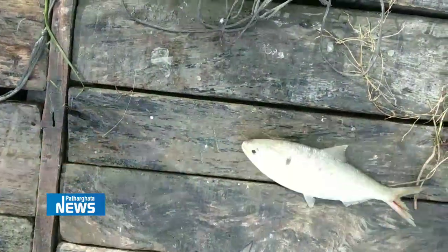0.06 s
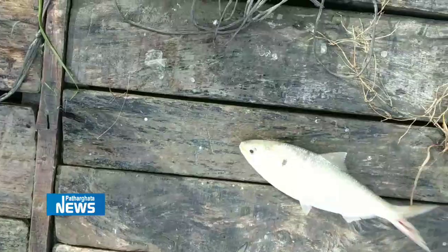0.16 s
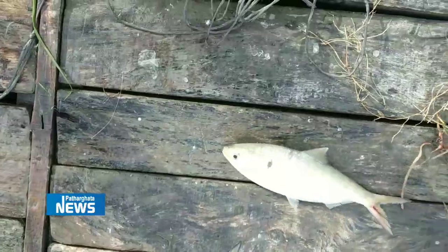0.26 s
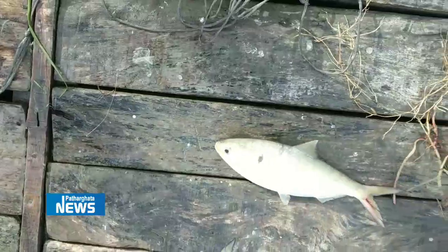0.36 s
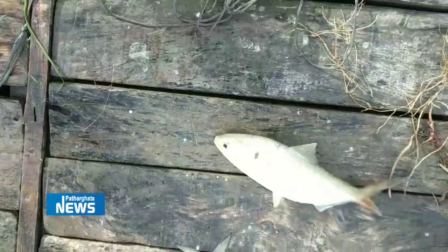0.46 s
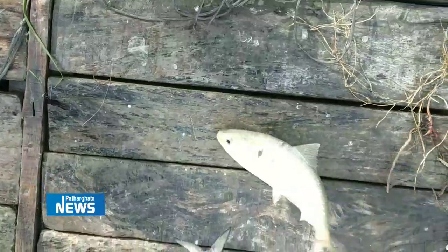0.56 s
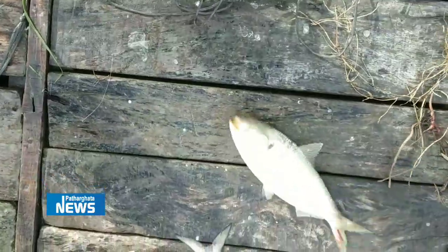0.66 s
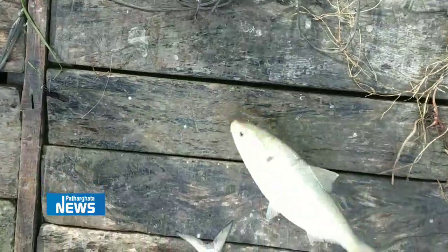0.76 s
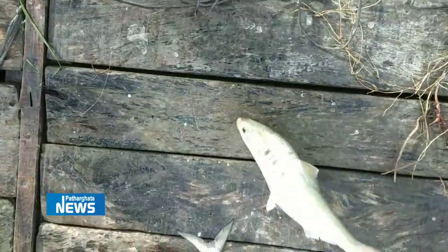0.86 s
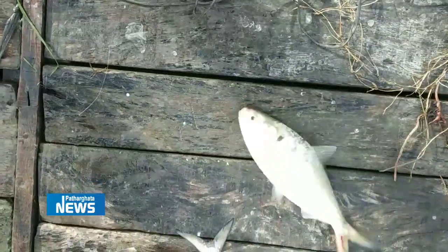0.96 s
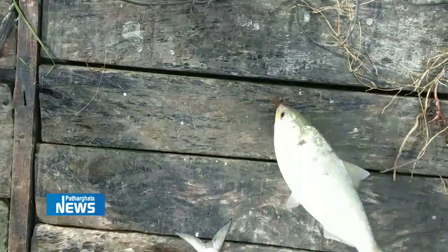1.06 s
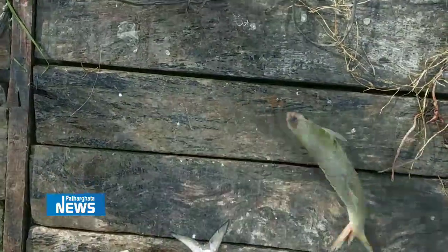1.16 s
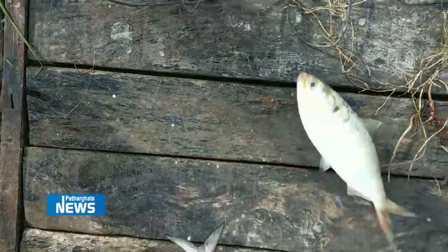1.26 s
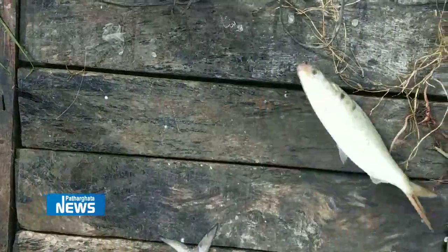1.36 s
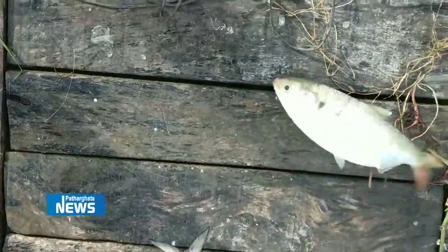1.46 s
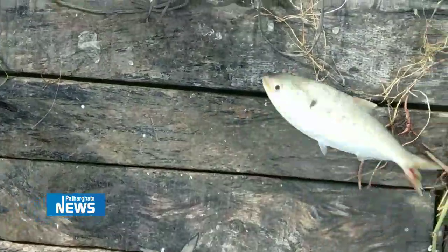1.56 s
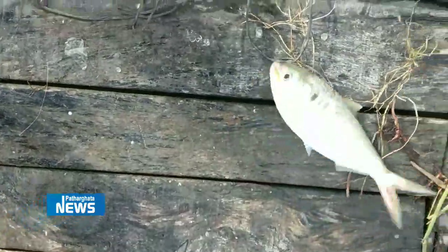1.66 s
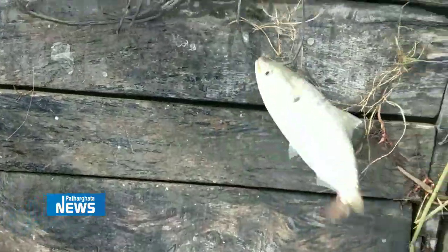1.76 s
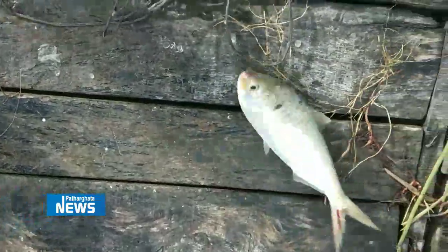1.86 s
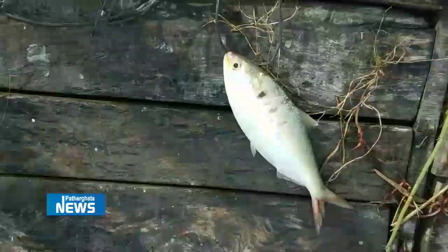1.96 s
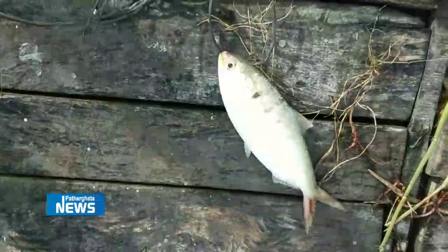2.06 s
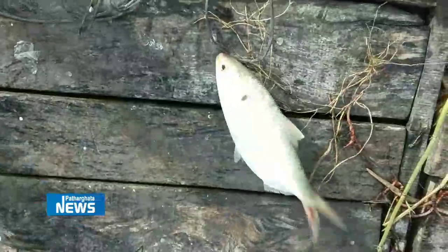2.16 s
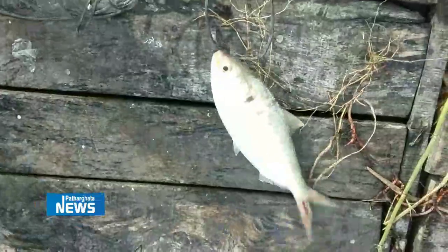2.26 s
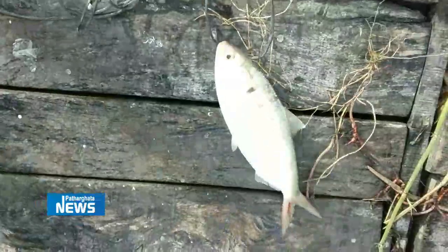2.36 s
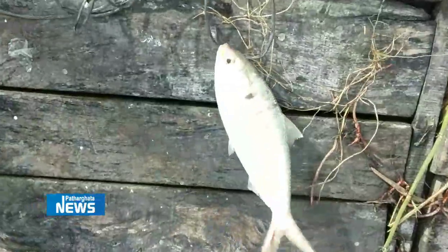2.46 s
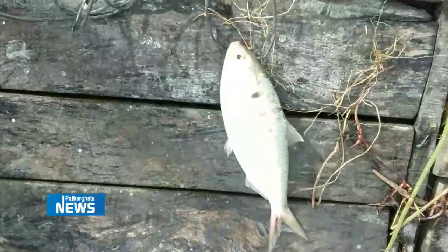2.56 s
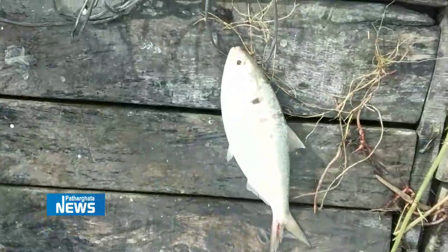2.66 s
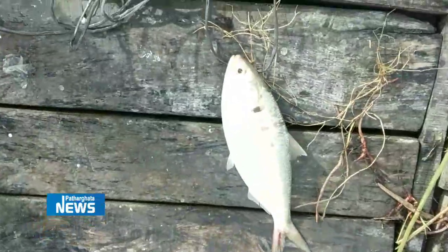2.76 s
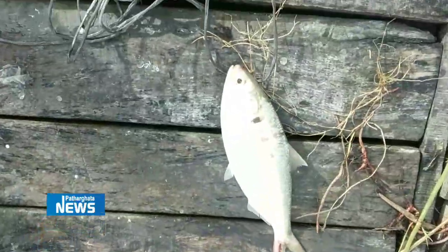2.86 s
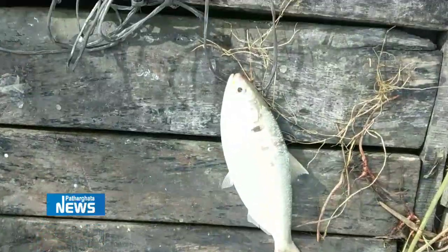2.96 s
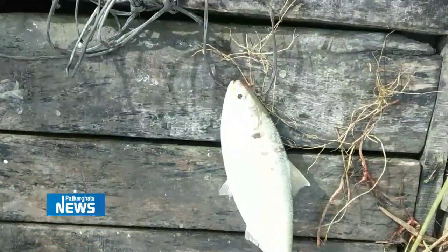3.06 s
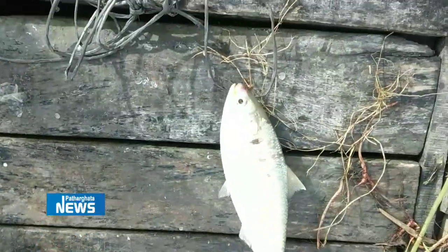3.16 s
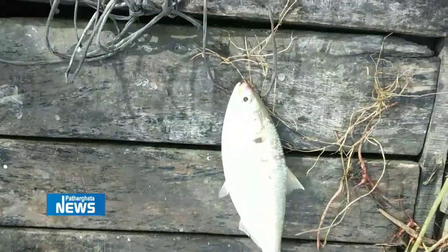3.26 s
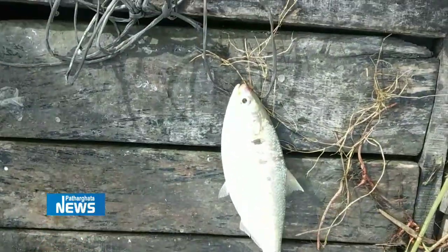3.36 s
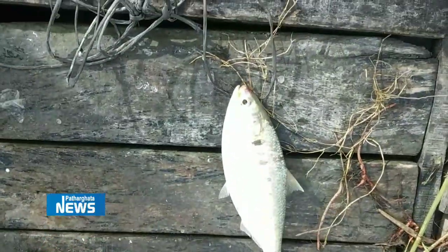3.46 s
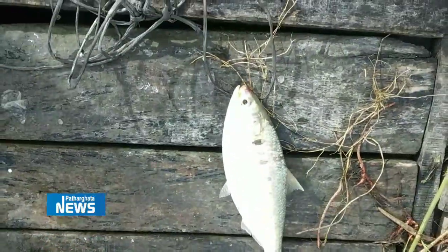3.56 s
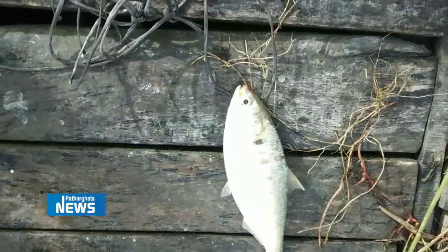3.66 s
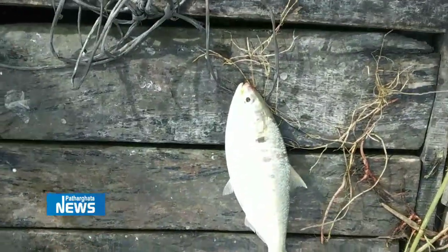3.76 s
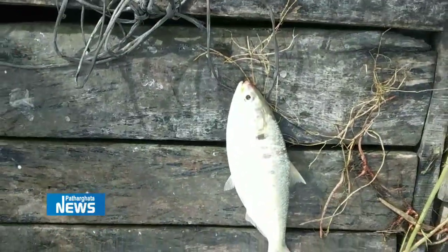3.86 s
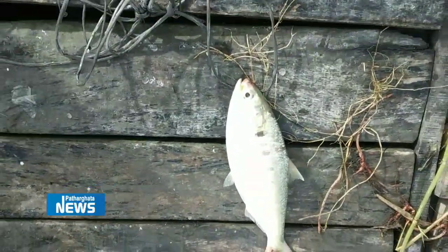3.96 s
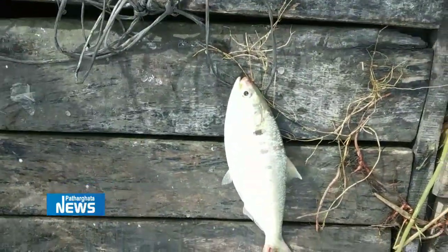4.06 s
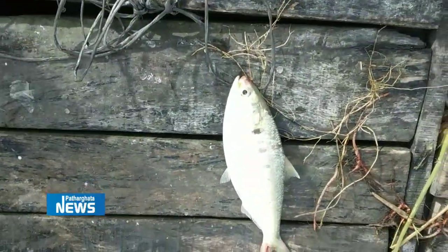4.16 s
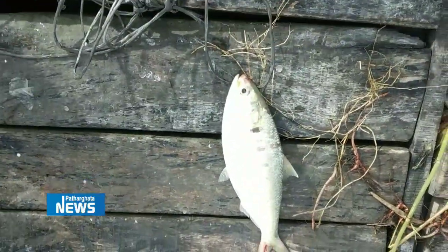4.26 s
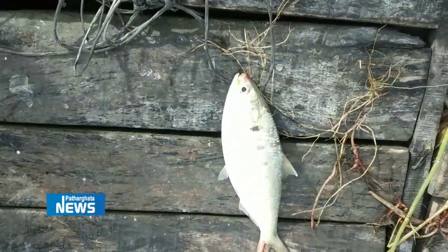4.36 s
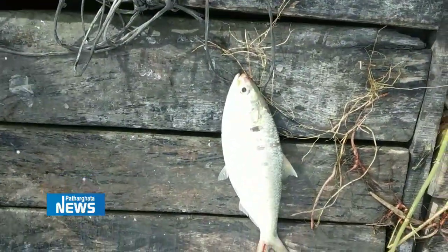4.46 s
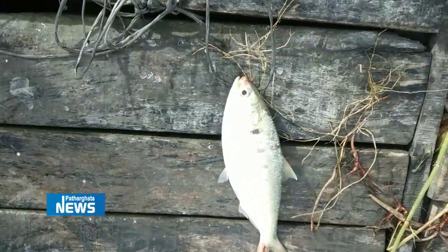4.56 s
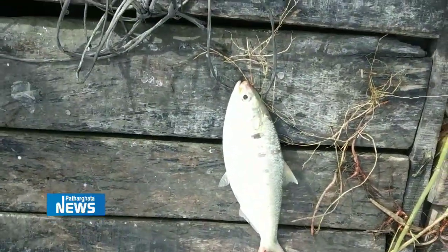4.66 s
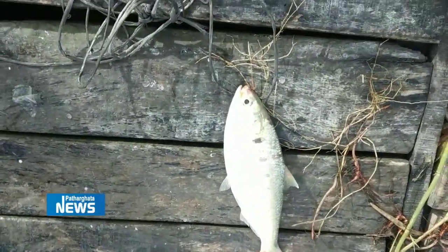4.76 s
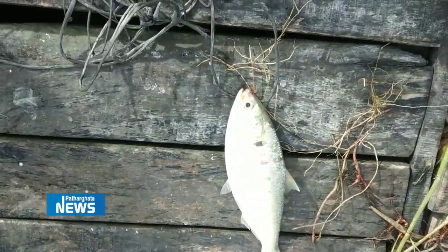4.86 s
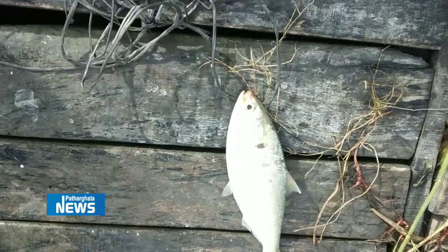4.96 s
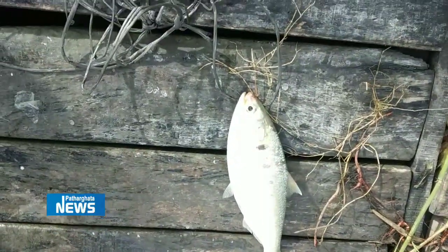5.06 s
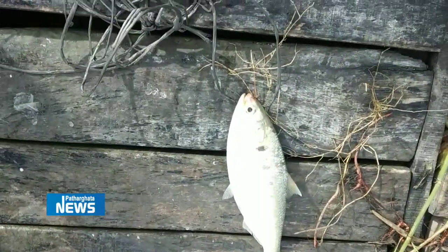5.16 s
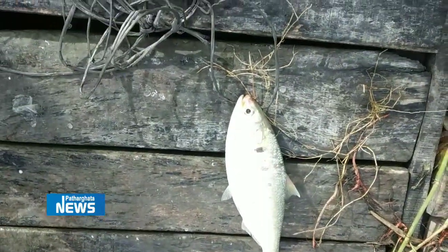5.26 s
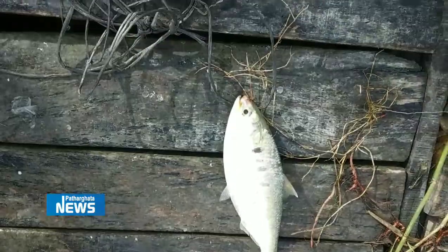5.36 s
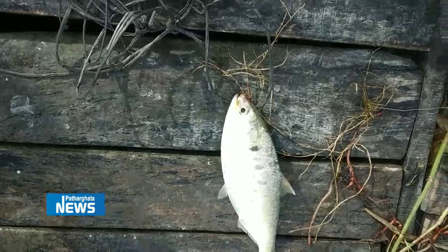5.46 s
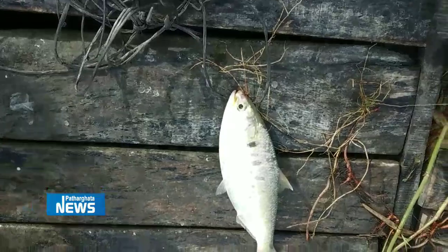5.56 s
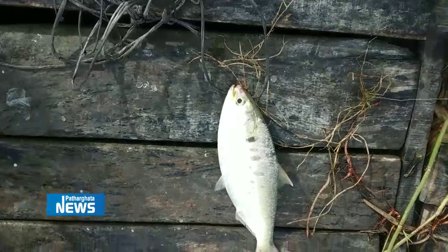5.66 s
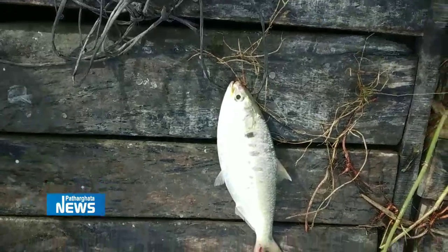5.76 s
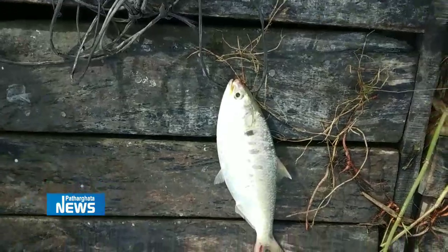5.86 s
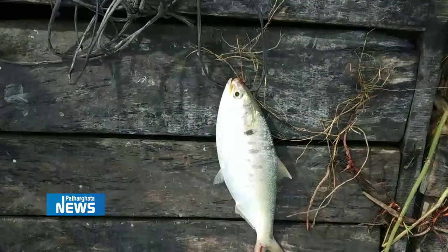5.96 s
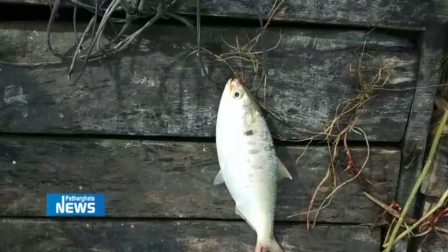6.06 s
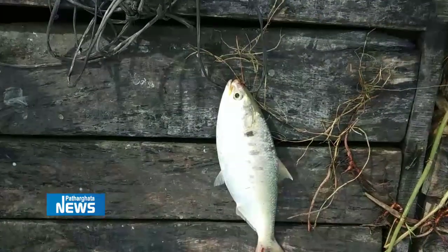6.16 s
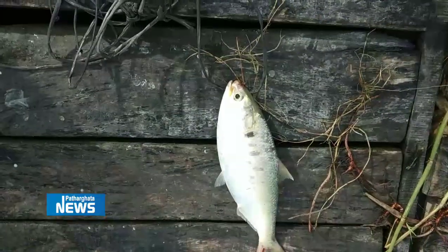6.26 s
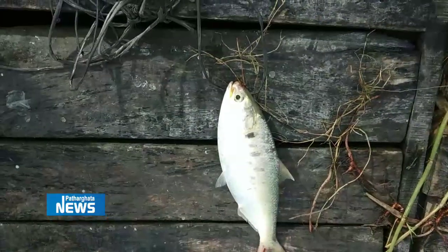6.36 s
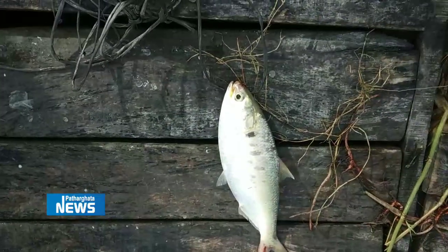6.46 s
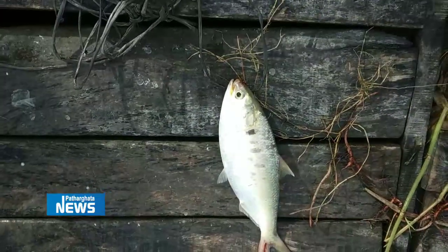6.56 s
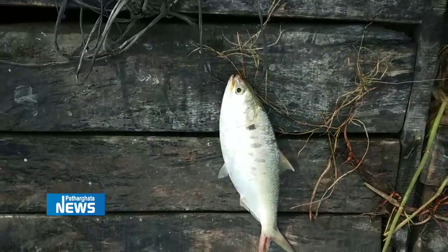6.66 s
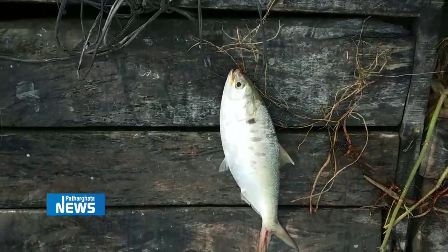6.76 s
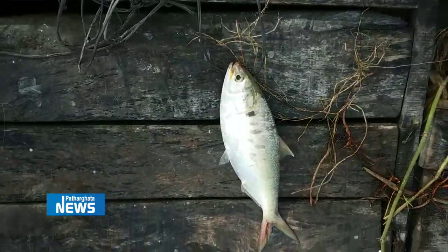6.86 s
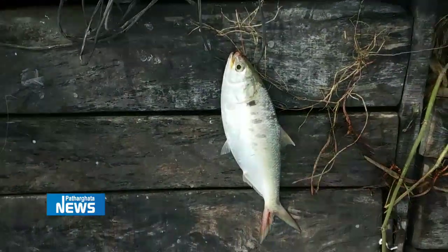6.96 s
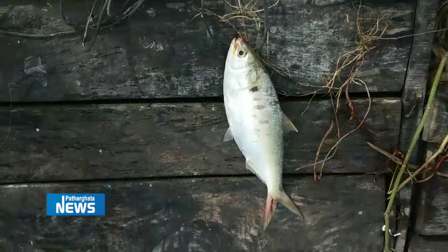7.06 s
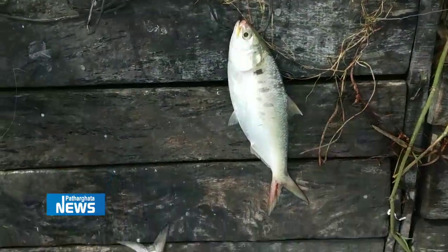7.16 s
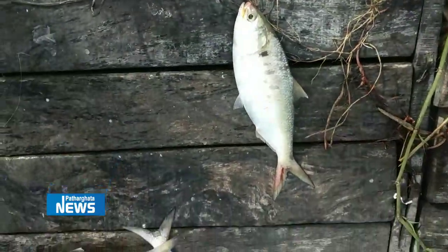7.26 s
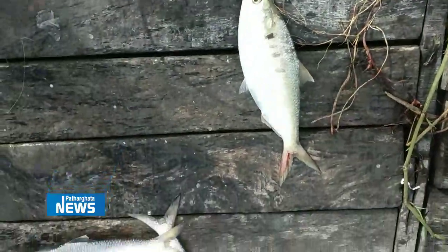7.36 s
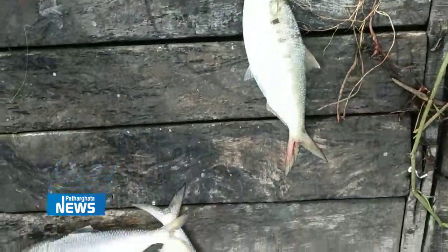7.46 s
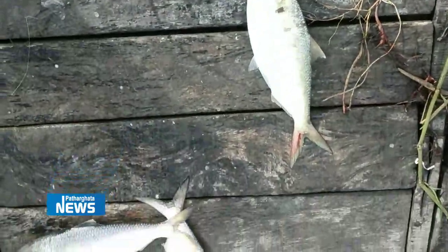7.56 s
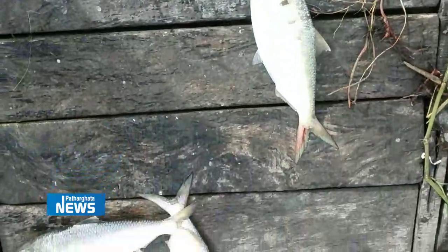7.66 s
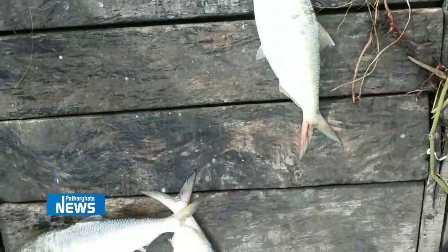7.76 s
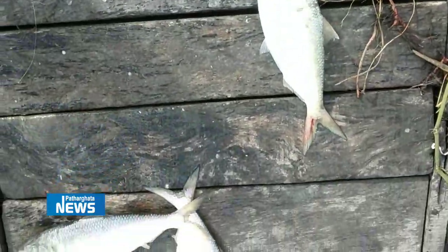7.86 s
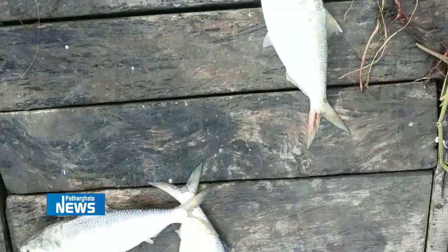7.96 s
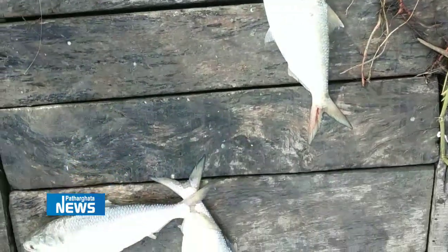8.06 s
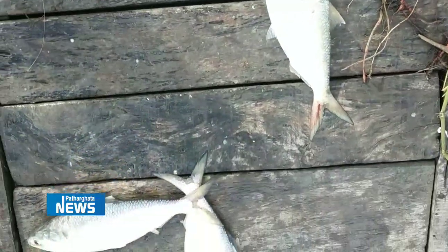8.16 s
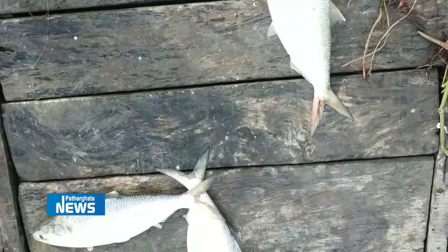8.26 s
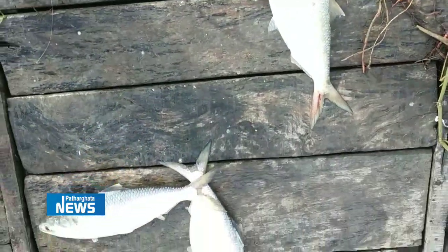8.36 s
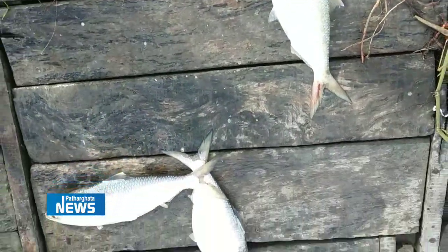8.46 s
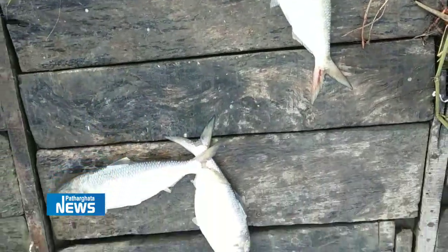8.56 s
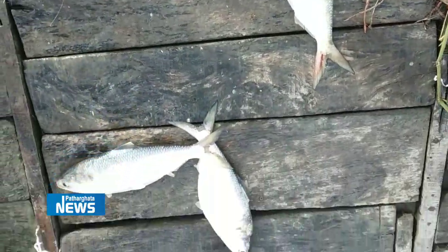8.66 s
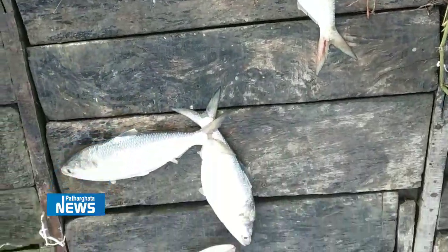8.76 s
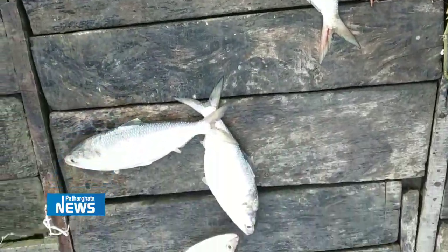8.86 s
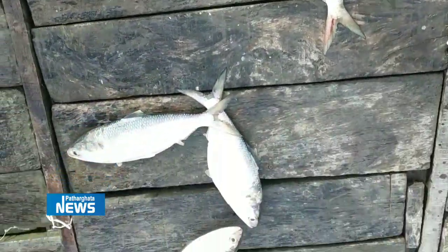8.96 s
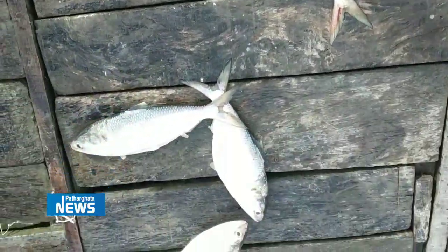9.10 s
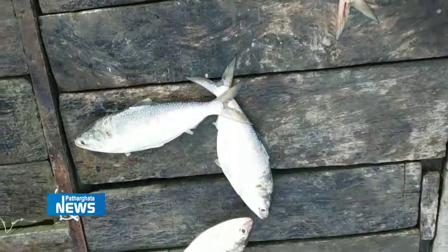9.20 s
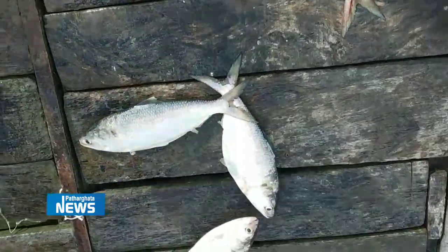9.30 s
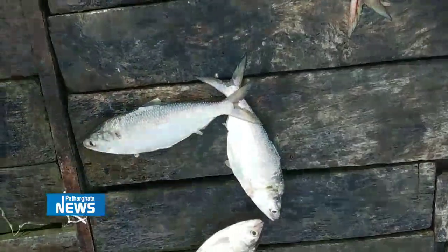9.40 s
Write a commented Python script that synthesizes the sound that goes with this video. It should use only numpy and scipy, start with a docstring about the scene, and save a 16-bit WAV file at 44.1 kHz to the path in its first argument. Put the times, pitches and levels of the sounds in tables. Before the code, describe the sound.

Outdoors on a small wooden boat, an idling diesel putters about fourteen times a second throughout. Near the microphone a fish flops violently, its body booming on the deck and its tail smacking wetly, with tiny squeaks. The flurry dies soon after two seconds; faint rustling, occasional crisp ticks, loose wood clacks and soft low wind buffets remain.

```python
"""A one-cylinder diesel chugs some way off to the left and a light wind brushes the microphone throughout.
From the start a freshly caught fish thrashes on a boat's wet planks: its body thumps the boards and rolls,
its tail slaps and slithers. Loose wood knocks, trapped air pops and thin squeaks join in.
After two seconds the fish tires, leaving twitches, wet ticks and a faint rustle.
Blows ring decaying tones; rubbing, water, wind and clatter are coloured noise; the engine is timed puffs."""
import sys
import numpy as np
from scipy import signal
from scipy.fft import rfft, irfft, next_fast_len
from scipy.io import wavfile

SR = 44100
rng = np.random.default_rng(int(sys.argv[2]) if len(sys.argv) > 2 else 0)


def wav_out(sig):
    """Save sig, one row per channel (or a flat mono array), as 16-bit PCM at SR to the path in sys.argv[1]."""
    wavfile.write(sys.argv[1], SR, np.round(np.clip(np.atleast_2d(sig).T, -1, 1) * 32767).astype(np.int16))


N = 415863
TIME = np.arange(N) / SR
AGE = TIME[:SR // 2]   # seconds since a blow
CUTOFF_HZ = 15700   # nearly everything above is removed
# In all tables t60 is the seconds a sound needs to fall by 60 dB. Levels are relative:
# the functions may add a common level on top.


def from_db(db):
    """Turn decibels into a gain."""
    return 10 ** (np.asarray(db) / 20)


def rms_one(x):
    """Scale to an rms (average strength) of 1."""
    return x / np.sqrt(np.mean(x ** 2) + 1e-20)


def peak_one(x):
    """Scale to a peak of 1."""
    return x / (np.abs(x).max() + 1e-20)


def in_time(rows):
    """Join the points of a table by straight lines, one value per sample."""
    return np.interp(TIME, *np.transpose(rows))


def at_hz(points, hz):
    """Read a spectrum table on a log-frequency axis."""
    table_hz, value = np.transpose(points)
    return np.interp(np.log(hz), np.log(table_hz), value)


def pan(db):
    """Left and right gains that differ by this many dB; above 0 favours the left."""
    return from_db(np.array([[db], [-db]]) / 2)


def add(out, s, sound):
    """Mix a sound in from second s on."""
    i = max(int(s * SR), 0)
    out[:, i:i + sound.shape[-1]] += sound[..., :max(N - i, 0)]


def fade(t60):
    """Exponential decay after a blow."""
    return np.exp(-np.log(1000) * AGE / max(t60, 1e-3))


def mode(hz, t60):
    """One struck resonance: a tone that dies away."""
    return np.sin(2 * np.pi * hz * AGE) * fade(t60)


def pressure_swing(lead_s, width_s):
    """Pressure dips, then rises steeply through zero at lead_s and comes back; peak 1."""
    swing = (AGE - lead_s) / width_s
    return peak_one(swing * np.exp(-swing ** 2 / 2))


def resonate(x, hz, width_hz):
    """Filter through a two-pole resonance with gain 1 on top."""
    r = np.exp(-np.pi * width_hz / SR)
    feedback = [1, -2 * r * np.cos(2 * np.pi * hz / SR), r * r]
    return signal.lfilter(np.array([1, 0, -1]) * (1 - r * r) / 2, feedback, x)


def drift(rate):
    """Wander by chance through `rate` random points per second, with a spread near 1."""
    knots = rng.standard_normal(4096)
    return np.interp(TIME * rate, np.arange(len(knots)), knots)


def grains(spread_db):
    """Gain of half-millisecond grains of uneven size."""
    return from_db(spread_db * np.repeat(rng.standard_normal(N // 20 + 1), 20)[:N])


# How alike left and right are, for close and for distant sounds.
# Each row: frequency in Hz, likeness from -1 (opposite) to 1 (the same).
NEAR_LIKENESS = [(100,0.99),(1000,0.11),(4000,0.042),(12000,0.04)]
FAR_LIKENESS = [(30,0.76),(130,1),(290,0.87),(640,0.49),(1400,-0.63),(3100,0.18),(7000,-0.61)]


def noise(colour, likeness):
    """Stereo noise with a given spectrum and left-right likeness; rms 1."""
    size = next_fast_len(N)
    hz = np.maximum(np.arange(size // 2 + 1) * SR / size, 1)
    alike = np.clip(at_hz(likeness, hz), -1, 1)
    gain = from_db(at_hz(colour, hz)) * (hz > 12) * (hz < CUTOFF_HZ + 500)
    # the shared part grows with likeness, the opposed part shrinks
    shares = np.sqrt([1 + alike, 1 - alike])
    mid, side = irfft(rfft(rng.standard_normal((2, size))) * gain * shares, size)[:, :N]
    return rms_one(np.array([mid + side, mid - side]))


def pieces(x, count):
    """Cut random stretches of a noise, one for each blow."""
    return [x[:, i:i + len(AGE)] for i in rng.integers(0, N - len(AGE), count)]


def popping(born, low_hz, high_hz, cycles):
    """Deal clicks at random to short resonances spread in pitch; rms 1."""
    pitches = np.geomspace(low_hz, high_hz, 20)
    dealt = rng.integers(0, len(pitches), N)
    rung = 0
    for k, hz in enumerate(pitches):
        # the tiny offset keeps the filter from slowing down on near-zero numbers
        rung = rung + resonate(born * (dealt == k) + 1e-18, hz, 2 * hz / cycles) / hz
    return rms_one(rung)


# Colour of the steady air and water. Each row: frequency in Hz, level per Hz in dB.
AIR_COLOUR = [(15, -36), (25, -8), (55, -2), (86, 5), (221, -8.5), (359, -19), (523, -15), (703, -20.5),
              (826, -21), (945, -23.5), (1490, -25), (2420, -27.5), (4620, -33.5), (10600, -62),
              (15500, -64)]
# Colour of the wind. Each row: frequency in Hz, level per Hz in dB.
WIND_SPECTRUM = [(15,-37),(35,1.5),(60,-8.5),(110,-12),(200,-25.5),(400,-38),(1000,-94)]
# How alike the wind is left and right. Each row: frequency in Hz, likeness from -1 to 1.
WIND_LIKENESS = [(30,0.16),(150,0.67)]
# Gusts of wind. Each row: time of the peak in seconds, level in dB, seconds to swell or die away.
WIND_GUSTS = [(.48, -22, 0.029), (.65, -34.5, 0.42), (1.85, -48, 0.086), (2.45, -36, 0.099),
              (5.75, -41.5, 0.11), (6.6, -38, 0.069), (7.17, -30.5, 0.14), (7.38, -39, 0.1),
              (7.6, -35.5, 0.18), (8.2, -39.5, 0.19), (9.0, -42.5, 0.31)]


def outdoors(air_db=-42, breeze_db=-57, lump_db=3.5):
    """A steady wash of air and water, and a lumpy breeze with gusts, mostly on the right."""
    air = from_db(air_db) * noise(AIR_COLOUR, FAR_LIKENESS)
    power = from_db(breeze_db) ** 2
    for s, db, swell_s in WIND_GUSTS:
        power = power + from_db(db) ** 2 * np.exp(-((TIME - s) / swell_s) ** 2)
    lumps = from_db(lump_db * drift(17))
    wind = np.sqrt(power) * lumps * noise(WIND_SPECTRUM, WIND_LIKENESS)
    return air + wind * pan(-7)


# The idling engine wanders slightly in speed. Each row: time in seconds, firings per second.
ENGINE_SPEED = [(0, 14.2484), (2.7, 14.0704), (4.2, 14.2296), (5.9, 14.1381), (8.1, 14.2364),
                (9.43, 14.1675)]
# Exhaust and hull resonances. Each row: pitch in Hz, level in dB, t60 in seconds.
HULL_MODES = [(70.17,-41.5,0.65),(118,-67,0.075),(149.7,-53,0.43),(203,-37.5,0.11),(296.7,-52.5,0.41),(497.2,-62.5,0.89),(553.4,-53,0.24)]
# Colour of the engine's clatter. Each row: frequency in Hz, level per Hz in dB.
CLATTER_SPECTRUM = [(250,-19),(400,7),(560,11.5),(800,4),(1100,10),(1700,6),(2400,10),(3200,-0.5),(4100,-1.5),(7000,-31)]
# Level of clatter, knocks and pipe as the microphone moves about. Each row: time in seconds, level in dB.
CLATTER_EXPOSURE = [(0, -3), (2.8, -5), (4.1, -0.5), (5.5, -2.5), (7.8, 0), (8.6, -3.5), (9.43, -7)]
UNEVEN_DB = 1.5   # spread of strength from firing to firing
SPOT_DB = 2.5   # spread of strength from one ringing tone to the next


def engine(puff_db=-34, puff_s=0.0018, bark_db=-42, bark_s=0.00074,
           hull_db=-4.0, hull_lead_s=0.00381, first_firing_s=.0441,
           clatter_db=-50.5, clatter_rise_s=.0009, clatter_t60=.032, clatter_lead_s=0.0027,
           echo_s=.010, echo_db=-9, between_db=-23, grain_db=2,
           lag_s=0.00031, direct_db=-4, scattered_db=-6):
    """Each firing is one exhaust puff that rings the hull, and a burst of gritty clatter."""
    cycles = np.cumsum(in_time(ENGINE_SPEED)) / SR
    cycles = cycles - np.interp(first_firing_s, TIME, cycles)
    # a firing falls on every whole cycle
    firings = np.interp(np.arange(int(cycles[-1]) + 1), cycles, TIME)
    lead_s = .01   # the puff begins before its steepest point
    # pressure swings up, then drops steeply through zero
    puff = -from_db(puff_db) * pressure_swing(lead_s, puff_s)
    puff = puff - from_db(bark_db) * pressure_swing(lead_s, bark_s)
    rings = np.array([from_db(db + hull_db) * mode(hz, t60) for hz, db, t60 in HULL_MODES])
    burst = (1 - np.exp(-AGE / clatter_rise_s)) * fade(clatter_t60)
    chug, gate = np.zeros((2, 1, N))
    for s in firings:
        force = from_db(UNEVEN_DB * rng.standard_normal(len(HULL_MODES) + 1))
        add(chug, s - lead_s, force[0] * puff)
        add(chug, s - hull_lead_s, force[1:] @ rings)
        add(gate, s - clatter_lead_s, force[0] * burst)
        # the clatter comes back off the hull
        add(gate, s - clatter_lead_s + echo_s, force[0] * from_db(echo_db) * burst)
    exposure = from_db(in_time(CLATTER_EXPOSURE))
    # some clatter remains between firings
    bursts = rms_one((gate[0] + from_db(between_db)) * grains(grain_db))
    clatter = from_db(clatter_db) * exposure * bursts
    left = chug[0] + from_db(direct_db) * clatter * noise(CLATTER_SPECTRUM, NEAR_LIKENESS)[0]
    scattered = from_db(scattered_db) * clatter * noise(CLATTER_SPECTRUM, FAR_LIKENESS)
    # the sound reaches the right side a little later
    right = np.interp(TIME - lag_s, TIME, left)
    return np.array([left, right]) * pan(0.096) + scattered + exposure * knocking(firings)


# The exhaust pipe's bark at each firing. Each row: middle pitch in Hz, level in dB, t60 in seconds.
PIPE_MODES = [(540, -43.5, .045), (830, -46, .03), (1250, -48, .025), (2150, -45, .025)]


def knocking(firings, knock_db=-40, knock_low_hz=2200, knock_high_hz=3600, knock_t60=0.015,
             lead_s=.0028, late_s=0.001973):
    """Each firing rings the exhaust pipe and knocks loose parts, with changing force and pitches."""
    out = np.zeros((2, N))
    swell = 1 - np.exp(-AGE / .0005)
    for s in firings:
        knocks = [(hz, knock_db, knock_t60) for hz in rng.uniform(knock_low_hz, knock_high_hz, 2)]
        barks = [(hz * rng.uniform(.82, 1.18), db, t60) for hz, db, t60 in PIPE_MODES]
        force_db = UNEVEN_DB * rng.standard_normal()
        for hz, db, t60 in knocks + barks:
            gain = from_db(db + force_db + SPOT_DB * rng.standard_normal((2, 1)))
            add(out, s - lead_s + late_s * rng.random(), gain * swell * mode(hz, t60))
    return out


# Scales and fins slide on wet wood. Each row: start in seconds, length in seconds, level in dB.
SLIDE_STROKES = [(0.036, 0.53, -41.5), (.16, 0.13, -39), (0.53, 0.22, -43), (0.626, 0.022, -27),
                 (.661, 0.052, -33), (0.75, 0.35, -45.5), (1.265, 0.066, -48), (3.514, 0.065, -45.5),
                 (3.629, 0.11, -43.5), (5.485, 0.12, -49), (5.685, 0.22, -46.5), (6.033, 0.05, -43.5)]
# Faint wet rustle of the fish lying about. Each row: time in seconds, level in dB.
RUSTLE_LEVEL = [(0, -52.5), (2.2, -53), (2.8, -57), (3.6, -50), (4.3, -56), (5.6, -49.5), (9.43, -50)]
# Colour of the sliding and rustling. Each row: frequency in Hz, level per Hz in dB.
SLIDE_SPECTRUM = [(500,1),(1500,-13),(3000,-1),(5000,1),(8000,4),(11000,4.5),(13000,0.5),(15500,-0.5)]
# Colour of the body rolling on the boards. Each row: frequency in Hz, level per Hz in dB.
ROLL_SPECTRUM = [(40,-4),(100,0.5),(170,-8),(260,-8),(450,-27),(900,-24),(1500,-45),(3000,-29),(8000,-44)]


def sliding(scales_db=-1.5, rustle_db=-1, rough_db=1.73, grain_db=1.7, catch_db=3.5,
            roll_db=-1, lurch_db=9.0, edge_s=0.024):
    """Scales catch and slip in short gritty strokes while the body rolls on the boards."""
    catching = from_db(scales_db + catch_db * drift(45)) ** 2
    scales = catching * strokes(SLIDE_STROKES, edge_s)
    swells_db = 2 * drift(14)
    power = from_db(in_time(RUSTLE_LEVEL) + rustle_db + swells_db) ** 2 + scales
    gritty = noise(SLIDE_SPECTRUM, NEAR_LIKENESS) * grains(grain_db)
    hiss = rms_one(gritty * from_db(rough_db * drift(120))) * np.sqrt(power)
    lurches = from_db(roll_db + lurch_db * drift(39.87))
    roll = noise(ROLL_SPECTRUM, NEAR_LIKENESS) * rolling() * lurches
    crackle = scale_catches() * np.sqrt(scales)
    return (hiss + crackle) * pan(0.76) + roll * pan(-2.5)


def strokes(rows, edge_s):
    """Power of rubbing strokes that set in, hold and stop."""
    power = 0
    for s, length, db in rows:
        from_edge = np.minimum(TIME - s, s + length - TIME)
        power = power + (from_db(db) * np.clip(from_edge / edge_s + .5, 0, 1)) ** 2
    return power


def scale_catches(level_db=-6, catches_per_s=1200, spread_db=4, low_hz=1800, high_hz=11000, cycles=12):
    """Single scales snag on the wet grain and let go: a fine fizz, each click at its own pitch."""
    sizes = from_db(spread_db * np.minimum(rng.standard_normal(N), 2))
    born = (rng.random(N) < catches_per_s / SR) * sizes
    return from_db(level_db) * np.array([popping(born, low_hz, high_hz, cycles) for side in "LR"])


# The body writhes and rolls over the boards. Each row: start in seconds, length in seconds, level in dB.
BODY_ROLLS = [(0, 0.41, -50.5), (.56, .38, -39.5), (2.0, 0.392, -41.5)]


def rolling(edge_s=0.021, settle_db=-25, settle_t60=0.36):
    """How strongly the body rubs the boards: while it writhes, and as it rocks after each landing."""
    power = strokes(BODY_ROLLS, edge_s)[None]
    for s, db, _ in LANDINGS:
        add(power, s, (from_db(db + settle_db) * fade(settle_t60)) ** 2)
    return np.sqrt(power[0])


def squelching(level_db=-18.0, per_s=180, spread_db=4, cycles=16, low_hz=600, high_hz=2400):
    """Slime pockets pop between the rolling body and the boards, each at its own pitch."""
    born = (rng.random(N) < per_s / SR) * from_db(spread_db * rng.standard_normal(N))
    return popping(born, low_hz, high_hz, cycles) * rolling() * from_db(level_db)


# The body lands on the planks. Each row: start in seconds, peak level in dB,
# hardness on a dB scale (higher means more treble against the bass).
LANDINGS = [(0.039, -16.5, -27), (0.209, -18, -17), (0.413, -23.5, -3), (0.464, -15.5, 6), (0.469, -2, 1),
            (0.473, -3.5, -13), (0.483, -12.5, -10), (0.495, -19.5, 5), (0.504, -11.5, -8),
            (0.513, -15, -6), (0.525, -16, -14), (0.653, -22.5, -43), (0.696, -12.5, -11.5),
            (0.901, -19.5, 3.5), (0.984, -20.5, -9), (1.006, -12.5, -8), (1.062, -9, -5), (1.298, -16, -15),
            (1.431, -19, -2), (1.5, -14, -12), (1.769, -16.5, -16.5), (1.826, -12.5, -15),
            (1.923, -24.5, -23), (2.191, -14, -4.5), (6.546, -28, -35)]
# Ringing tones of the deck planks. Each row: pitch in Hz, level in dB, t60 in seconds.
PLANK_MODES = [(119.9,-4.5,0.61),(161,7,0.14),(176.6,2,0.11),(286,-23,0.14),(352.6,-5,0.095),(393,-10,0.16),(473,-9,0.15),(517,-13,0.041),(750,-7.5,0.024),(874,-14.5,0.068),(950,-20.5,0.04),(1115,-18,0.064),(1400,-17.5,0.076),(1543,-24.5,0.073),(2098,-23.5,0.11),(2400,-14,0.038)]
# Colour of the contact noise. Each row: frequency in Hz, level per Hz in dB.
CRACK_SPECTRUM = [(100,-1),(400,5),(900,2),(1500,-2.5),(2600,-6.5),(3300,-37),(9000,-29)]


def thumps(hard_db=9, hard_share=0.56, crack_db=-2, crack_t60=.025, tail_db=-15, tail_t60=0.37,
           push_db=6, push_s=0.0055, damped_db=7.0, soft_hz=220, hard_hz=800,
           side_db=-14, detune=.015):
    """Each landing pushes and rings the planks; a hard one is briefer, with more upper modes and crack."""
    out = np.zeros((2, N))
    hz, mode_db, t60 = np.transpose(PLANK_MODES)
    # 0 for low modes, 1 for those that hardness fully affects
    upper = np.clip(np.log(hz / soft_hz) / np.log(hard_hz / soft_hz), 0, 1)
    cracks = pieces(noise(CRACK_SPECTRUM, NEAR_LIKENESS), len(LANDINGS))
    # a quick crack, then the whole deck shivers
    dying = fade(crack_t60) + from_db(tail_db) * fade(tail_t60)
    for (s, db, hardness), crack in zip(LANDINGS, cracks):
        treble_db = hard_share * hardness + hard_db
        # pitch and strength shift with the spot that is hit
        rings = np.array([mode(f * (1 + detune * rng.standard_normal()), t) for f, t in zip(hz, t60)])
        # the upper modes swing either way, depending on where the body lands
        signs = np.where(upper > .5, rng.choice([-1, 1], len(hz)), -1)
        # the body pressed on the boards keeps them from ringing much harder
        ring_db = min(treble_db, damped_db)
        gains = signs * from_db(mode_db + upper * ring_db + SPOT_DB * rng.standard_normal(len(hz)))
        # each mode radiates a little differently to the two sides
        gains = gains * (1 + from_db(side_db) * rng.standard_normal((2, len(hz))))
        # the board gives way and springs back
        contact = np.minimum(AGE / (push_s * from_db(-treble_db / 2)), 1)
        push = -from_db(push_db) * np.sin(2 * np.pi * contact) * np.sin(np.pi * contact)
        blow = gains @ rings + push + from_db(crack_db + treble_db) * crack * dying
        add(out, s, from_db(db) * peak_one(blow))
    return out


# Wet slaps of tail and fins. Each row: start in seconds, level in dB, brightest pitch in Hz,
# left minus right in dB, t60 in seconds.
TAIL_SLAPS = [(0.042, -12.5, 10100, -3, 0.0047), (0.413, -17, 2600, -5, 0.05), (0.467, -18, 9100, -3, .04),
              (0.4672, -13.5, 2400, -4, 0.012), (0.472, -11, 1400, -2, .015), (0.476, -12.5, 5500, 5, 0.1),
              (0.4929, -2.5, 5850, -4, 0.0095), (0.631, -24, 2800, -5, 0.036),
              (0.6945, -17, 5900, 4, 0.017), (0.779, -37, 6800, -1, .012), (0.982, -8.5, 14700, 6, 0.019),
              (1.0147, -4.5, 9000, 0, 0.013), (1.017, -14.5, 2400, -2, 0.092), (1.0609, -9, 2970, 2, 0.033),
              (1.297, -23, 1500, 3, 0.025), (1.424, -9.5, 8450, 2.5, 0.039), (1.5, -21.5, 4460, 9, 0.021),
              (1.589, -9.5, 8600, 0, 0.023), (1.7543, -4, 11200, 2, 0.0075),
              (1.8263, -10.5, 4900, 3, 0.027), (1.938, -12, 6070, 2, 0.022),
              (2.1918, -17, 9800, 11, 0.0042), (2.5677, -16, 7700, 1.5, 0.016),
              (2.846, -23.5, 8600, 2, 0.016), (3.239, -21.5, 6540, 1, 0.044),
              (5.2344, -19, 10900, 3, 0.028), (5.2512, -22.5, 10300, 5, 0.019),
              (5.8235, -17, 6370, 0, 0.027), (5.914, -13.5, 7660, 3, .028), (7.656, -20.5, 9350, 2, 0.21),
              (7.7971, -16, 10900, 2, 0.12), (7.811, -16.5, 8350, 3, 0.061),
              (7.979, -26.5, 10900, 6, 0.012), (8.13, -24, 10000, 3, 0.017), (8.7354, -26, 8650, 7, 0.015),
              (9.134, -26, 8750, 1.5, 0.03)]
# Colour of slaps and ticks. Each row: frequency in Hz, level per Hz in dB.
SLAP_SPECTRUM = [(300,-26),(1200,1.5),(3000,1.5),(4500,6),(6500,8.5),(10000,10),(13000,10.5),(15500,7.5)]


def slaps(level_db=-15, grain_db=-1.5, pocket_db=6, pocket_width_hz=1800, snap_s=0.001424, snap_db=1,
          resnap_s=.0023, resnap_db=-6, spray_db=-27, spray_t60=0.2):
    """The water film snaps twice and crackles, coloured by the pocket under the fin; fine spray follows."""
    out = np.zeros((2, N))
    crackle = noise(SLAP_SPECTRUM, NEAR_LIKENESS) * grains(grain_db)
    snap = from_db(snap_db) * np.exp(-((AGE - snap_s) / 0.0001) ** 2)
    # the film tears a second time
    snap = snap + from_db(snap_db + resnap_db) * np.exp(-((AGE - snap_s - resnap_s) / 0.0001) ** 2)
    rise = 1 - np.exp(-AGE / .001)
    spray = from_db(spray_db) * fade(spray_t60)
    for (s, db, hz, side_db, t60), burst in zip(TAIL_SLAPS, pieces(crackle, len(TAIL_SLAPS))):
        burst = burst + from_db(pocket_db) * resonate(burst, hz, pocket_width_hz)
        burst = burst * (snap + rise * (fade(t60) + spray))
        # strength is set by the first ten milliseconds
        burst = burst / burst[:, :SR // 100].std()
        add(out, s, from_db(db + level_db) * pan(side_db) * burst)
    return out


def wet_ticks(per_s=5, level_db=-41, spread_db=3, t60=0.15):
    """Tiny bubbles of slime part at random."""
    out = np.zeros((2, N))
    count = 80
    times = np.cumsum(rng.exponential(1, count)) / per_s
    bursts = pieces(noise(SLAP_SPECTRUM, NEAR_LIKENESS), count)
    for s, burst, size in zip(times, bursts, rng.standard_normal(count)):
        add(out, s, from_db(level_db + spread_db * size) * peak_one(burst * fade(t60)))
    return out


# Light knocks of loose wood. Each row: start in seconds, peak level in dB, pitch the contact favours in Hz.
WOOD_KNOCKS = [(0.631, -25.5, 2140), (0.698, -34, 2150), (0.806, -33, 1340), (0.847, -32, 1220),
               (1.642, -32, 1250), (3.076, -29, 740), (4.3259, -21, 1860), (4.3292, -26, 1020),
               (4.332, -28, 700), (7.131, -27, 1290), (7.133, -25, 2570), (7.137, -25.5, 544),
               (7.159, -32, 900)]
# Ringing tones of the loose wood. Each row: pitch in Hz, level in dB, t60 in seconds.
WOOD_MODES = [(490, 6, 0.051), (727, 2, 0.083), (920, 4, 0.056), (1096, -1, 0.042), (1640, -3, 0.1),
              (1970, 2.5, 0.049), (2380, -8, 0.057), (2830, -8, 0.049)]
# Short hollow plops about the boat. Each row: start in seconds, pitch in Hz, level in dB, t60 in seconds.
HOLLOW_PLOPS = [(.413,342,-23,0.13),(3.27,366,-36.5,0.075),(5.51,636,-39,0.1),(6.548,548,-39,0.078),(9.09,418,-37,0.094)]


def loose_wood(contact_t60=0.0074, ring_db=-15, reach_octaves=0.51,
               rattle_db=-20, rattle_t60=0.13, rise_s=0.00055):
    """A short pitched contact rings the modes near its pitch; a few hollow plops sound among the knocks."""
    out = np.zeros((2, N))
    # each pair: frequency in Hz, level per Hz in dB
    rattle_colour = [(150, 1), (550, 14), (2200, 1.0), (3500, -14), (8000, -70)]
    rattles = pieces(noise(rattle_colour, NEAR_LIKENESS), len(WOOD_KNOCKS))
    swell = 1 - np.exp(-AGE / rise_s)
    mode_hz, mode_db, mode_t60 = np.transpose(WOOD_MODES)
    rings = np.array([mode(f, t) for f, t in zip(mode_hz, mode_t60)])
    for (s, db, hz), rattle in zip(WOOD_KNOCKS, rattles):
        reached = np.exp(-(np.log2(mode_hz / hz) / reach_octaves) ** 2)
        gains = reached * from_db(mode_db + ring_db) * rng.choice([-1, 1], (2, len(WOOD_MODES)))
        rattling = from_db(rattle_db) * rattle * fade(rattle_t60)
        clack = mode(hz, contact_t60) + gains @ rings + rattling
        add(out, s, from_db(db) * peak_one(swell * clack))
    for s, hz, db, t60 in HOLLOW_PLOPS:
        add(out, s, from_db(db) * swell * mode(hz, t60))
    return out


# Air trapped under a flank that lands flat pops out.
# Each row: time of the pop in seconds, peak level in dB, half width in seconds.
AIR_CLAPS = [(0.4692, -10.5, 0.00057), (0.4776, -21, 0.00066), (0.4983, -16, 0.00014),
             (0.5055, -17, 0.00026), (0.9025, -21, 0.00017), (1.0633, -12, 0.00027), (1.8285, -20, 0.00021),
             (2.1943, -27, .0003)]


def claps():
    """Each pocket of air gives one short swing of pressure, down and then up."""
    out = np.zeros((2, N))
    lead_s = .005   # start early, so that the middle of the swing falls on its time
    for s, db, width_s in AIR_CLAPS:
        add(out, s - lead_s, from_db(db) * pressure_swing(lead_s, width_s))
    return out


# Faint squeaks. Each row: start in seconds, length in seconds, first pitch in Hz, last pitch in Hz, level in dB.
SQUEAK_GLIDES = [(0.732, 0.07, 613, 1000, -38), (0.843, 0.056, 1000, 1360, -35),
                 (3.344, 0.055, 1260, 1500, -43.5), (6.593, 0.03, 2090, 2040, -40.5),
                 (6.637, 0.049, 2180, 2350, -32.5)]


def squeaks(level_db=-9, waver_hz=150, catch_db=4):
    """Thin sliding tones that catch and break up as they swell and fade."""
    out = np.zeros((2, N))
    wavers = pieces(waver_hz * drift(400)[None], len(SQUEAK_GLIDES))
    catches = pieces(from_db(catch_db * drift(200))[None], len(SQUEAK_GLIDES))
    for (s, length, start_hz, end_hz, db), waver, catch in zip(SQUEAK_GLIDES, wavers, catches):
        along = np.minimum(AGE / length, 1)
        hz = start_hz + (end_hz - start_hz) * along + waver
        tone = np.sin(2 * np.pi * np.cumsum(hz) / SR)
        add(out, s, from_db(db + level_db) * catch * np.sin(np.pi * along) * tone)
    return out


def scene():
    """The fish close by, engine and weather around it."""
    fish = sliding() + squelching() + thumps() + slaps() + wet_ticks() + claps()
    return outdoors() + engine() + fish + loose_wood() + squeaks()


def record(dry, ceiling=.85):
    """The highest peaks clip; then a steep filter cuts the top."""
    top_cut = signal.ellip(10, .2, 80, CUTOFF_HZ, fs=SR, output="sos")
    return signal.sosfilt(top_cut, np.clip(dry, -ceiling, ceiling))


dry = scene()
out = record(dry)
wav_out(out)
```